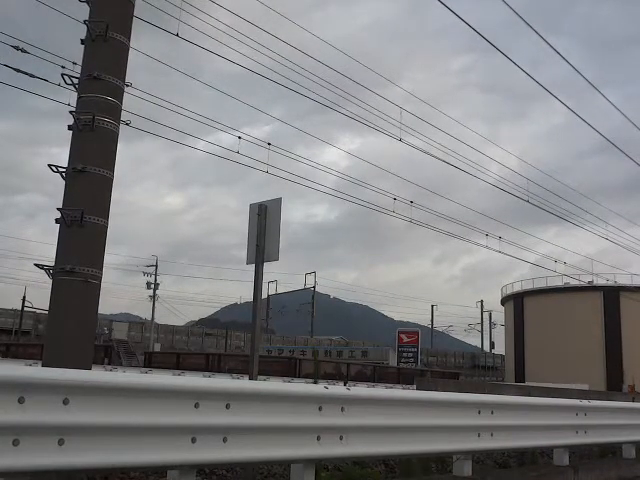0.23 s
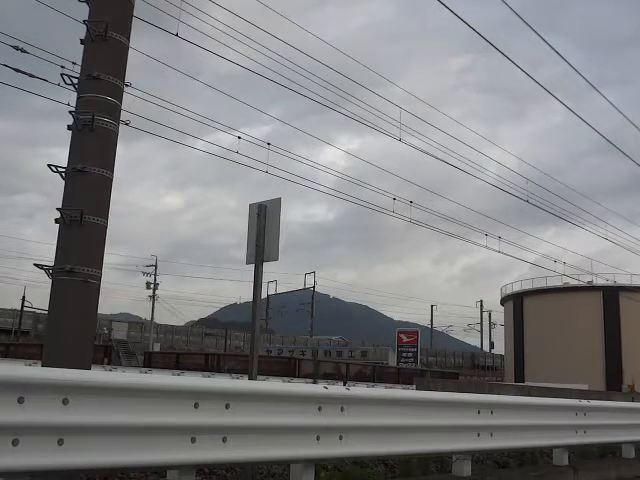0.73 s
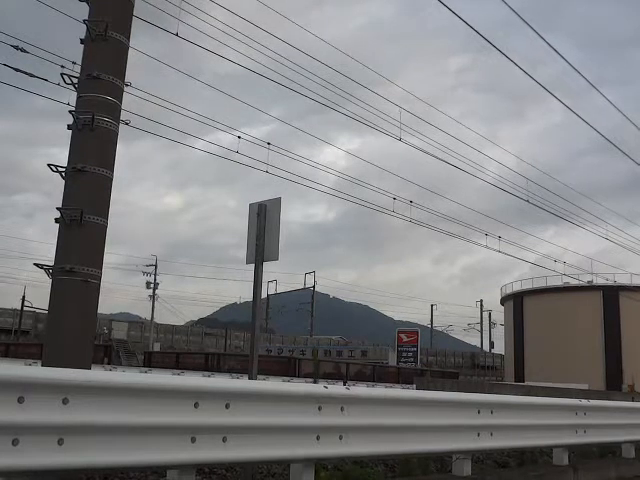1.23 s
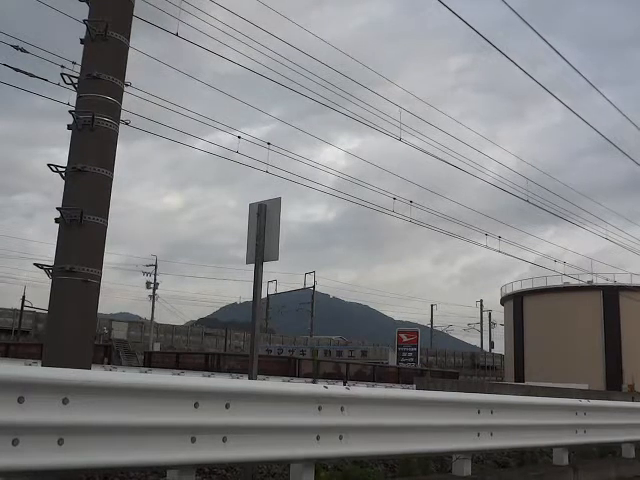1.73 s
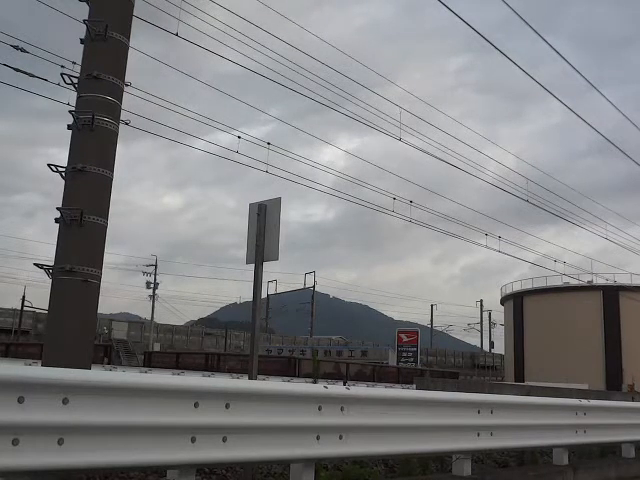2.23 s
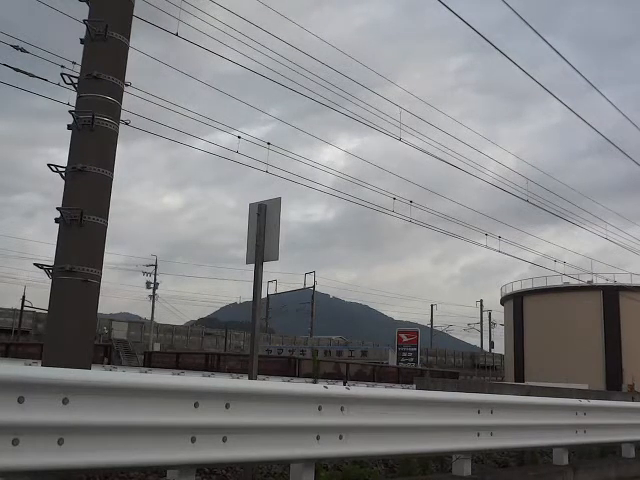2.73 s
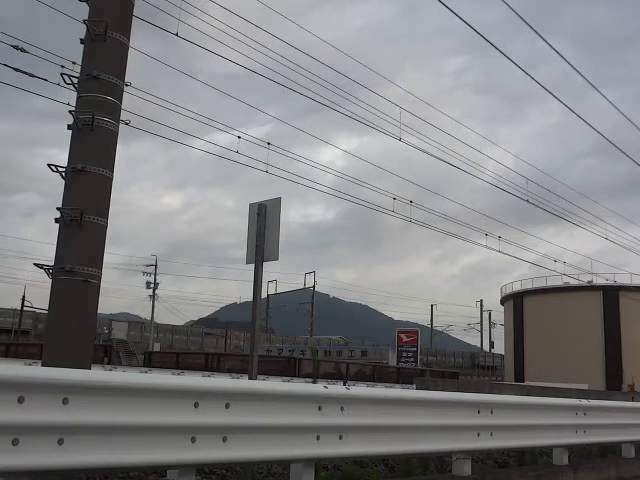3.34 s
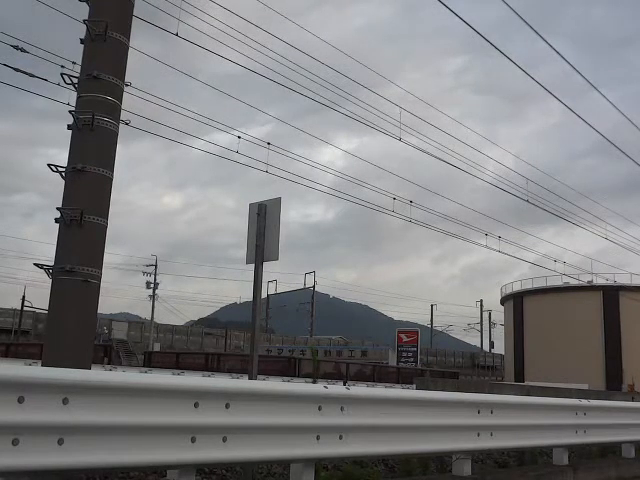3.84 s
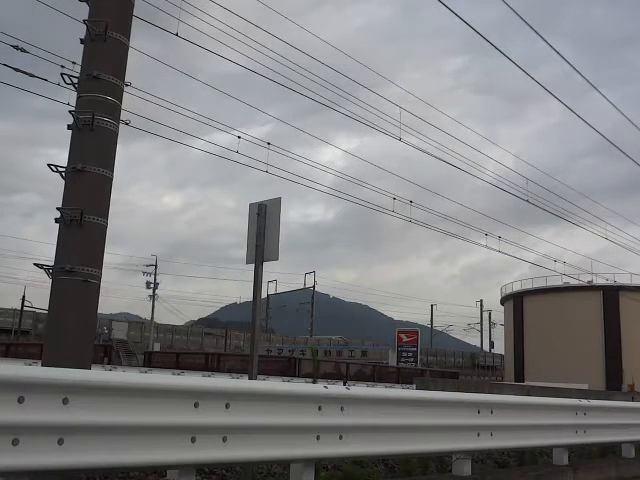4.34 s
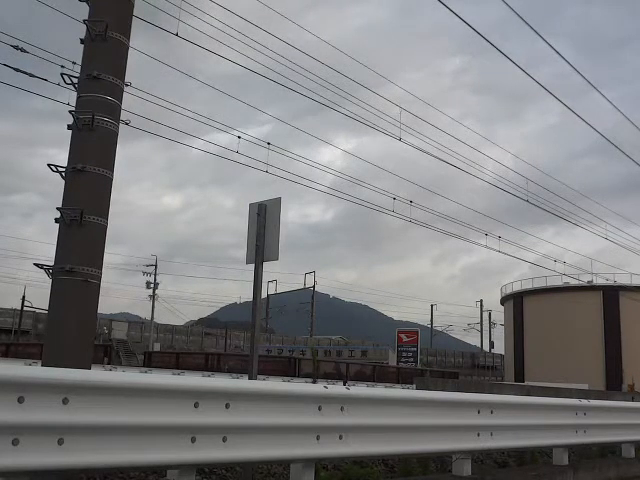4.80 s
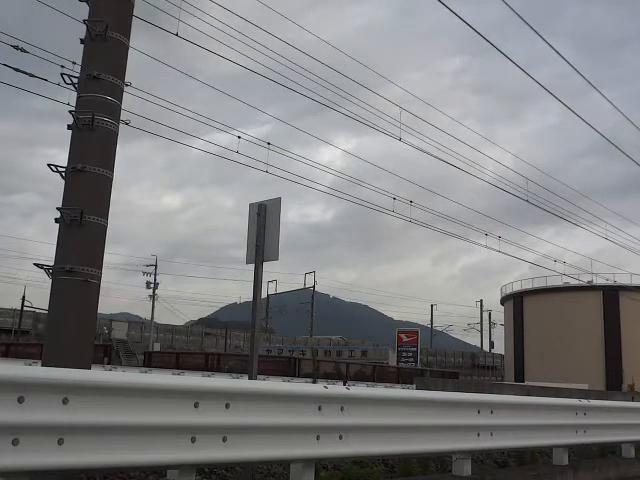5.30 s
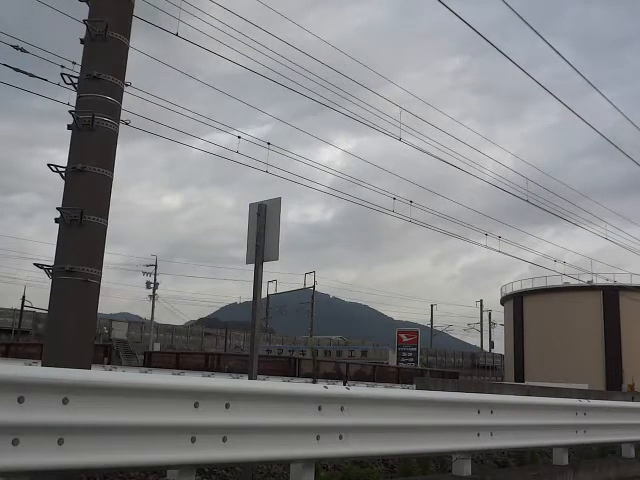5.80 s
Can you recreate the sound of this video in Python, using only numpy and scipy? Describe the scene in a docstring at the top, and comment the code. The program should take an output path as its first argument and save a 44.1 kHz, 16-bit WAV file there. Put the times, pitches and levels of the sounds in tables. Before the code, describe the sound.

A chorus of cicadas sizzles steadily outdoors in summer, while one shriller insect calls in swells that turn quick and gradually fade. Far off, an engine idles under a low rumble. Close to the microphone, something hard snaps sharply about a second in, then later ticks three times with a light rustle and a tiny squeak. A few faint scuffs and soft bumps follow as the cicadas carry on.

```python
"""A chorus of cicadas sizzles in the trees beside a railway line on a summer day.
Each cicada buzzes by clicking its tymbals, small drum-like plates on its body. One shriller insect
calls in quick swells and fades. Far off, an engine idles under a low rumble, with a faint whine.
Close by, something hard is knocked and rings: it snaps once and ticks three times, with a light
rustle and a thin squeak. There are also a few fainter clicks, soft bumps and scuffs."""
import sys
import numpy as np
from scipy import signal
from scipy.fft import rfft, irfft
from scipy.io import wavfile
from scipy.ndimage import uniform_filter1d

SR = 44100
rng = np.random.default_rng(int(sys.argv[2]) if len(sys.argv) > 2 else 0)


def put_to_file(sound):
    """Save the sound as 16-bit audio at rate SR, in the file named by the first command-line argument."""
    columns = np.atleast_2d(sound).T  # one column per channel
    safe = np.clip(columns, -1, 1)
    whole_steps = np.round(safe * 32767)
    wavfile.write(sys.argv[1], SR, whole_steps.astype(np.int16))


N = 267246
TIME = np.arange(N) / SR


def gain_of(db):
    """Turns decibels (dB) into a number to multiply a sound by."""
    return 10 ** (np.asarray(db) / 20)


def evened(x):
    """Scales a signal so that its average strength (rms) is 1."""
    return x / np.sqrt(np.mean(np.abs(x) ** 2) + 1e-20)


def at_pitch(rows, hz):
    """Looks up rows of (Hz, value) at any pitch, blending between the rows."""
    row_hz, value = np.transpose(rows)
    return np.interp(np.log(hz + 1), np.log(row_hz + 1), value)


def curve(rows):
    """Joins rows of (seconds, value) with straight lines, giving a value for every sample."""
    return np.interp(TIME, *np.transpose(rows))


def add(mix, start_s, sound):
    """Adds a sound to the mix at the given time."""
    part = mix[max(round(start_s * SR), 0):][:len(sound)]
    part += sound[:len(part)]


def coloured(x, colour):
    """Makes some pitches louder and others softer, following rows of (Hz, dB)."""
    return irfft(rfft(x) * gain_of(at_pitch(colour, np.fft.rfftfreq(N, 1 / SR))), N)


def drift(rate):
    """A random wobble of strength 1 that swings up to `rate` times a second."""
    points = rng.standard_normal(N // 16)
    return evened(np.interp(2 * rate * TIME, np.arange(len(points)), points))


def distant_noise(colour, patchy_db):
    """Many far sources blur into stereo noise, with patches that come and go in time and pitch."""
    # Each row: pitch in Hz, how alike left and right are in the open air, from 0 to 1.
    ear_likeness = [(60, 0.99), (200, 0.92), (300, 0.76), (550, 0.15), (1200, 0.23), (1800, 0.28),
                    (2500, 0.88), (5300, 0.84), (11000, 0.79)]
    frames, hz = N // 512 + 5, np.fft.rfftfreq(2048, 1 / SR)
    a, b, c, d, patches = rng.standard_normal((frames, len(hz), 5)).T
    patches = uniform_filter1d(patches, size=12, axis=0)  # smooth across pitch
    patches = evened(uniform_filter1d(patches, size=9, axis=1))  # and across time
    alike = at_pitch(ear_likeness, hz)[:, None]
    left = a + 1j * b
    right = alike * left + np.sqrt(1 - alike ** 2) * (c + 1j * d)
    spectra = np.array([left, right]) * gain_of(at_pitch(colour, hz)[:, None] + patchy_db * patches)
    return evened(signal.istft(spectra, nperseg=2048, noverlap=1536)[1][:, :N])


def rumble():
    """A deep, nearly steady noise from far away."""
    # Each row: pitch in Hz, relative level in dB.
    colour = [(10, -16), (25, -2.5), (60, -0.5), (100, -4), (170, -2), (230, -3.5), (300, -6.5),
              (400, -13.5), (550, -17), (900, -18.5), (1200, -19.5), (1600, -24), (2200, -21.5),
              (5000, -54)]
    # Each row: time in seconds, level in dB.
    loudness = [(0, -47.5), (4, -47.7), (5.4, -49.5), (6.06, -49)]
    return distant_noise(colour, patchy_db=1.32) * gain_of(curve(loudness))


def engine(waver_db=1.5, wander_cycles=0.06):
    """An idling engine hums at multiples of its speed; each tone wavers on its long way through the air."""
    # Each row: time in seconds, engine cycles per second.
    speed = [(0, 16.17), (1.5, 16.66), (2.6, 16.86), (4.3, 16.86), (6.06, 16.55)]
    # Each row: time in seconds, level in dB.
    loudness = [(0, -46), (.7, -46), (2, -42.5), (2.8, -46), (3.6, -43.5), (4.5, -48), (5.3, -51),
                (6.06, -55.5)]
    # Each row: multiple of the engine speed, relative level of that tone in dB.
    overtones = [(3, -11), (4, -8.5), (5, -8), (7, -4), (8, -19), (9, -5.5), (10, -7.5), (12, 1.5),
                 (13, -7.5), (14, -12), (15, -17)]
    cycles = np.cumsum(curve(speed)) / SR
    hum = np.zeros(N)
    for multiple, db in overtones:
        strength = gain_of(db + waver_db * drift(3.9))
        turns = multiple * cycles + wander_cycles * drift(3.5) + rng.random()
        hum += strength * np.cos(2 * np.pi * turns)
    return evened(hum) * gain_of(curve(loudness))


def whine_and_squeak():
    """A far whine and, after the ticks, a thin squeak: each fades in, slides a little and fades out."""
    # Each row: start and length in seconds, level in dB, first and last pitch in Hz, waver rate in Hz.
    tones = [(.45, 1.4, -72, 1213, 1200, 25.2), (2.497, 0.054, -43, 4830, 5080, 148)]
    out = np.zeros(N)
    for start_s, length_s, db, first_hz, last_hz, waver_hz in tones:
        n = int(length_s * SR)
        turns = np.cumsum(np.linspace(first_hz, last_hz, n)) / SR
        waver = (drift(waver_hz) + 1j * drift(waver_hz))[:n]
        tone = evened((waver * np.exp(2j * np.pi * turns)).real)
        add(out, start_s, gain_of(db) * tone * signal.windows.tukey(n, .5))
    return out


def rustle(grain_db=3):
    """Fine grains of rubbing while the hard thing shifts."""
    # Each row: pitch in Hz, relative level in dB.
    colour = [(400, -23), (1600, -4), (3200, 4.5), (5000, -8), (6200, -7), (7500, -1), (10000, -10),
              (12000, -16)]
    # Each row: time in seconds, level in dB.
    loudness = [(2.3, -90), (2.37, -50), (2.41, -43.5), (2.47, -50), (2.53, -43.5), (2.57, -55),
                (2.64, -90)]
    grains = rng.standard_normal((2, N)) * gain_of(grain_db * drift(1500))
    blended = grains + .5 * grains[::-1]  # each ear hears some of the other side
    return evened(coloured(blended, colour)) * gain_of(curve(loudness))


def scuffs(grain_db=3):
    """Brief grainy rubs that rise quickly and trail off."""
    # Each row: start in seconds, level in dB, length in seconds.
    rubs = [(1.482, -46, 0.029), (2.346, -48.5, 0.014), (2.398, -53.5, 0.022), (2.48, -49, .025),
            (3.15, -45.5, .015), (3.162, -40.5, 0.037)]
    # Each row: pitch in Hz, relative level in dB.
    colour = [(150, -28), (380, 6), (550, -1), (750, -1), (1050, 1), (1450, -6.5), (1800, -9), (3000, -4),
              (6000, -14), (10000, -14), (12000, -33)]
    pressure = np.zeros(N)
    for start_s, db, length_s in rubs:
        age = np.maximum(TIME - start_s, 0) / (length_s / 4)  # the rub is loudest at age 1
        pressure += gain_of(db) * age * np.exp(1 - age)
    grains = rng.standard_normal(N) * gain_of(grain_db * drift(750))
    return pressure * evened(coloured(grains, colour))


def bumps():
    """Dull pushes, each only a few vibrations long at most."""
    # Each row: start in seconds, peak level in dB, pitch in Hz, length in seconds.
    pushes = [(1.488, -32.5, 210, 0.0057), (2.343, -33.5, 307, .016), (3.153, -29, 200, 0.0047),
              (3.173, -43, 372, 0.016), (4.398, -35.5, 32, 0.071), (4.701, -34.5, 92, 0.022),
              (4.77, -30.5, 89, 0.024)]
    out = np.zeros(N)
    for start_s, db, hz, length_s in pushes:
        t = np.arange(0, length_s, 1 / SR)
        swell = gain_of(db) * np.sin(np.pi * t / length_s)
        add(out, start_s, -swell * np.cos(2 * np.pi * hz * (t - length_s / 2)))
    return out


def bounces(count=4, first_gap_s=0.0064, gap_ratio=0.8):
    """Lists every touch of the hard thing: each hit bounces, ever sooner and weaker."""
    # Each row: start in seconds, peak level in dB, contact time in seconds, main ringing pitch in Hz,
    # brightness in dB per octave, lowest pitch shaken in Hz, level change per bounce in dB.
    hits = [(0.399, -33.5, .0015, 2500, -5, 1300, -20), (1.1158, -13.5, .0015, 4930, -1, 1600, -20),
            (1.1172, -8.5, .002, 2710, .5, 800, -17), (2.3983, -22, .0007, 4050, -2.5, 700, -9),
            (2.441, -20.5, 0.0035, 5240, 5, 900, -14), (2.485, -16, .0005, 3320, -4, 3600, -4),
            (3.175, -34.5, .0027, 9030, 4, 3000, -20)]
    delays = np.cumsum([0] + [first_gap_s * gap_ratio ** k for k in range(count - 1)])
    return [(start_s + delay, db + k * step_db, *touch)
            for start_s, db, *touch, step_db in hits for k, delay in enumerate(delays)]


def clicks(main_db=3.5, main_width_hz=550, grit=0.3):
    """A blow and a short gritty slip make the hard thing ring; the spot that is hit favours one pitch."""
    # Each row: ringing pitch in Hz, width in Hz (wider dies away sooner), relative level in dB.
    body_rings = [(860, 160, -7.5), (1150, 67, -20), (1500, 51, -9.5), (1810, 62, -14.5), (2220, 37, -24),
                  (2734, 160, -2), (2900, 56, -21), (3340, 290, -3.5), (4400, 130, -12), (4965, 170, -4.5),
                  (6020, 220, -10), (7300, 630, -9), (7880, 250, -12.5), (8260, 230, -10), (9570, 450, -6),
                  (10340, 510, -12.5)]
    out, t = np.zeros(N), np.arange(2048) / SR
    for start_s, db, contact_s, main_hz, brightness, low_hz in bounces():
        hz, width, ring_db = np.transpose(body_rings + [(main_hz, main_width_hz, main_db)])[:, :, None]
        strength = gain_of(ring_db + brightness * np.log2(hz / main_hz)) * width
        ring = (strength * np.exp(-np.pi * width * t) * np.sin(2 * np.pi * hz * t)).sum(0)
        blow = t == 0
        slip = rng.standard_normal(len(t)) * np.exp(-t / contact_s)
        force = blow + grit * slip / np.linalg.norm(slip)
        fade_in = 1 - np.exp(-2 * t / contact_s)
        click = signal.fftconvolve(force, ring)[:len(t)] * fade_in
        # light touches hardly stir the low pitches
        click = signal.sosfilt(signal.butter(2, low_hz, "highpass", fs=SR, output="sos"), click)
        add(out, start_s, gain_of(db) * click / abs(click).max())
    return out


def echoes(sound, near_fade_s=0.1, far_fade_s=0.42, far_db=-24, echoes_per_s=4000):
    """Sound bounces quickly off the ground and guard rail, then leaves a faint outdoor tail."""
    # Each row: pitch in Hz, boost or cut of the echoes in dB.
    colour = [(200, -22), (550, 7), (720, 1.5), (900, 8), (1200, 0.5), (1550, 3), (2800, -6.5), (4300, 0.5),
              (5200, -14), (8000, 0), (11000, -6)]
    arrivals = rng.standard_normal((2, N)) * (rng.random((2, N)) < echoes_per_s / SR) * (TIME > .002)
    tail = arrivals * (gain_of(-60 * TIME / near_fade_s) + gain_of(far_db - 60 * TIME / far_fade_s))
    tail /= np.linalg.norm(tail, axis=1, keepdims=True)
    return signal.fftconvolve(coloured(sound, colour)[None], tail, axes=1)[:, :N]


def shrill_insect(slow_db=-49.6, quick_db=-51.9, between_db=-14.5, uneven_db=0.8, rasp_db=2):
    """Raspy calls swell out of a soft buzz: four slow ones, then quick ones that slow down and fade."""
    # Each row: pitch in Hz, relative level in dB.
    colour = [(5500, -34), (6600, -1), (7300, 3.5), (8200, 2.5), (9000, 5), (9600, 3.5), (10000, -1.5),
              (10400, -1.5), (11000, -20), (12000, -45)]
    slow_start_s, slow_gap_s, slow_length_s = -0.016, 0.258, 0.165
    quick_start_s, quick_gap_s, quick_length_s = 0.997, 0.1277, 0.12
    gap_growth_s, fade_db_per_s = 0.00068, -2.75
    calls = [(slow_start_s + k * slow_gap_s, slow_db, slow_length_s) for k in range(4)]
    for k in range(36):
        elapsed_s = k * quick_gap_s + gap_growth_s * k ** 2 / 2
        calls.append((quick_start_s + elapsed_s, quick_db + fade_db_per_s * elapsed_s, quick_length_s))
    soft_buzz_db = quick_db + between_db + fade_db_per_s * np.maximum(TIME - quick_start_s, 0)
    power = gain_of(soft_buzz_db) ** 2
    for peak_s, db, length_s in calls:
        swell = np.exp(-np.pi * (2 * (TIME - peak_s) / length_s) ** 2)
        power += gain_of(db + uneven_db * rng.standard_normal()) ** 2 * swell
    song = distant_noise(colour, patchy_db=1.5) * np.sqrt(power)
    rasp = gain_of(-rasp_db * drift(350))
    return song * rasp * gain_of([[-.3], [.3]])  # slightly to the right


def cicadas(level_db=-42, click_hz=230, roughness=0.045, throb_db=0.25, near_count=4):
    """Many cicadas blur into a sizzle; the clicking tymbals of the nearest few roughen it."""
    # The main band of the chorus. Each row: pitch in Hz, relative level in dB.
    chorus_colour = [(1400, -36), (1900, -19), (2150, -9), (2400, -5.5), (2650, -3.5), (2900, -.3),
                     (3150, 2.4), (3600, -1), (4100, .2), (4700, 2.8), (5300, -1.2), (5950, -6),
                     (6400, -15), (9000, -38)]
    # Its weaker, higher band, with the same columns.
    sizzle_colour = [(5500, -25), (6500, -5), (7250, .5), (8200, -1), (9000, -1.3), (9550, -7),
                     (10100, -14), (11000, -26), (12000, -45)]
    beats = np.zeros(N)
    for hz in click_hz * np.geomspace(.6, 1.4, near_count):
        wavering_hz = hz * (1 + .06 * drift(11.77))
        beats += np.cos(2 * np.pi * np.cumsum(wavering_hz) / SR)
    buzz = evened(np.maximum(1 + roughness * evened(beats), 0))
    throb = gain_of(throb_db * drift(25))
    song = distant_noise(chorus_colour, patchy_db=1.4)
    song += gain_of(-12.5) * distant_noise(sizzle_colour, patchy_db=1.3)
    return song * buzz * throb * gain_of(level_db) * gain_of([[-.8], [.8]])  # slightly to the right


def scene():
    """Insects and engine in the distance, small noises close by."""
    low = (engine() + rumble()) * gain_of([[.2], [-.2]])  # left and right, in dB
    hard, soft = clicks(), scuffs()
    near = hard * gain_of([[.3], [-.3]]) + soft + bumps() + rustle()
    reflections = gain_of(-4) * echoes(hard) + gain_of(-5) * echoes(soft)
    return cicadas() + shrill_insect() + low + whine_and_squeak() + near + reflections


def record(dry, cutoff_hz=11100):
    """Cuts away the highest treble."""
    lowpass = signal.firwin(511, cutoff_hz, window=("kaiser", 9), fs=SR)
    return signal.oaconvolve(dry, lowpass[None], "same")


dry = scene()
out = record(dry)
put_to_file(out)
```